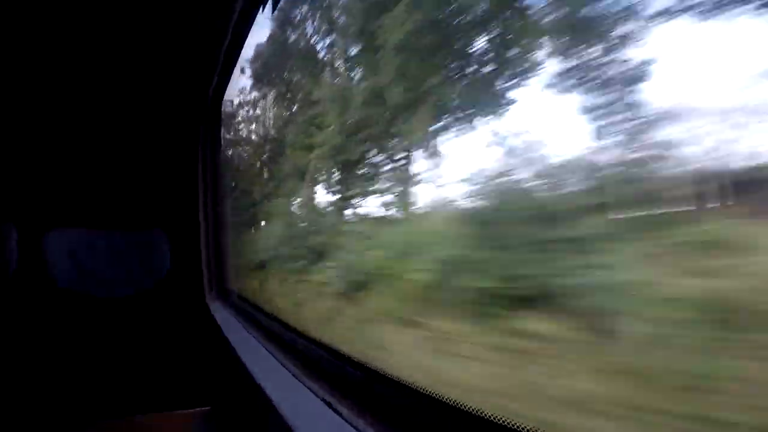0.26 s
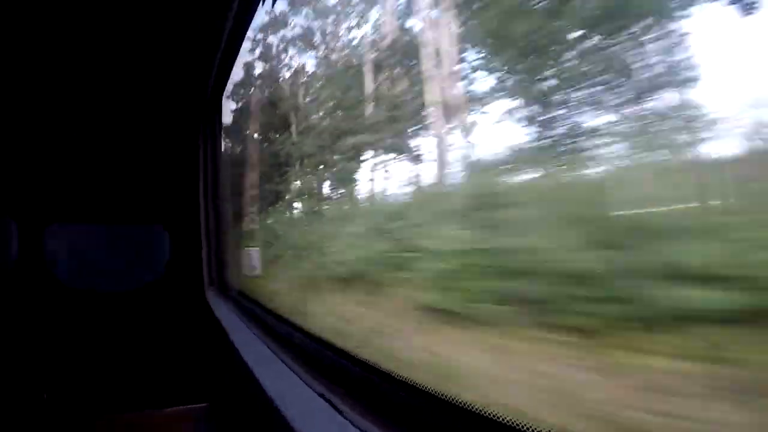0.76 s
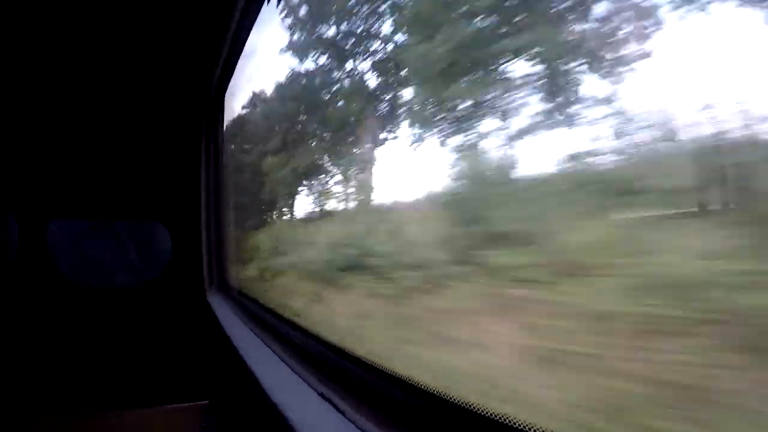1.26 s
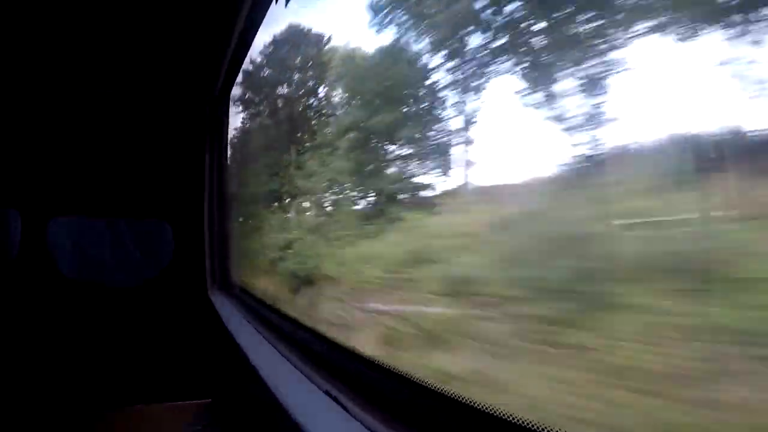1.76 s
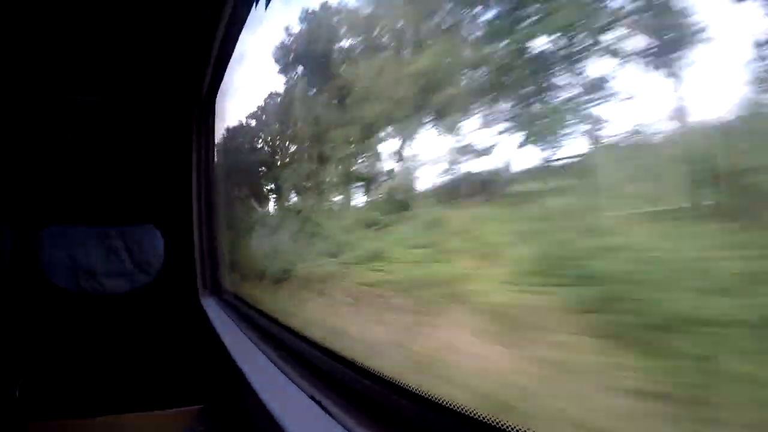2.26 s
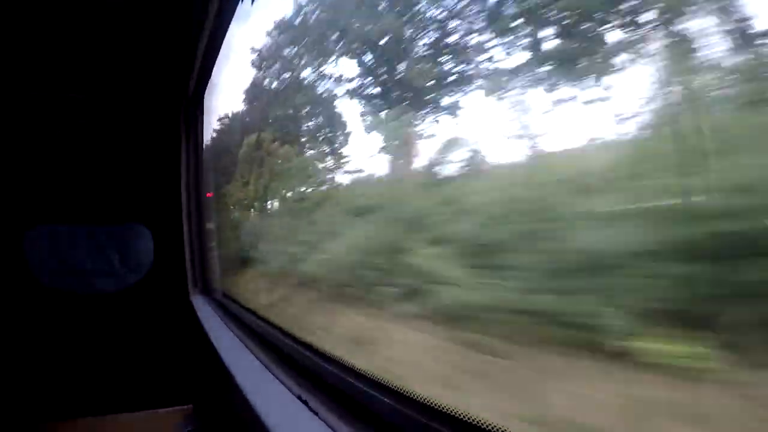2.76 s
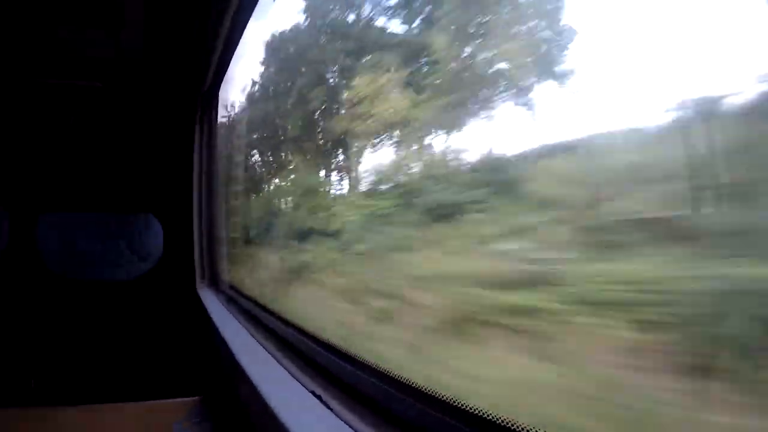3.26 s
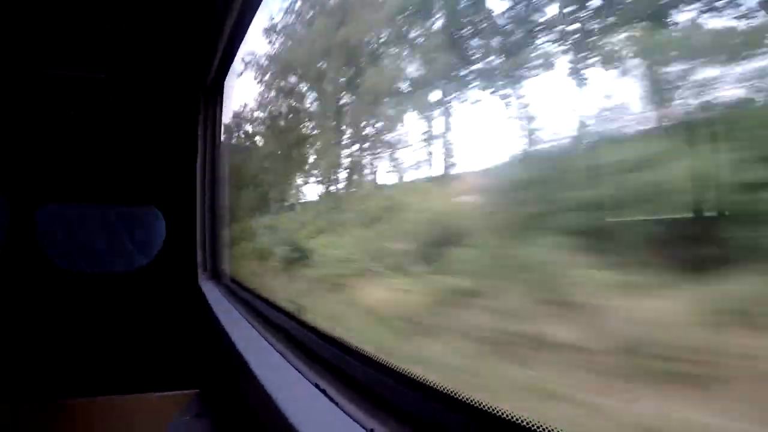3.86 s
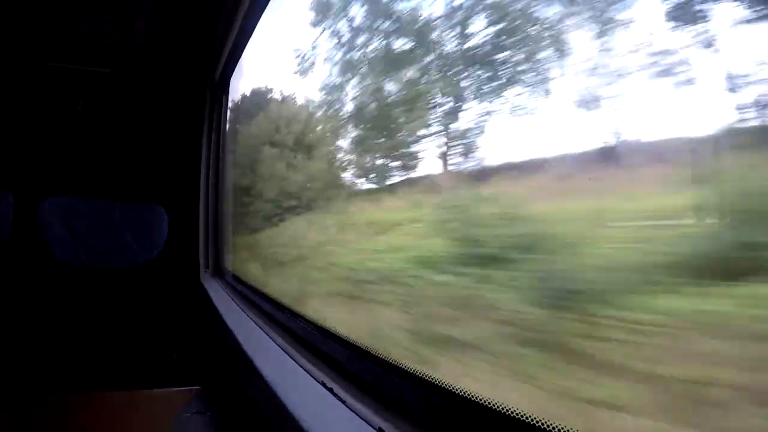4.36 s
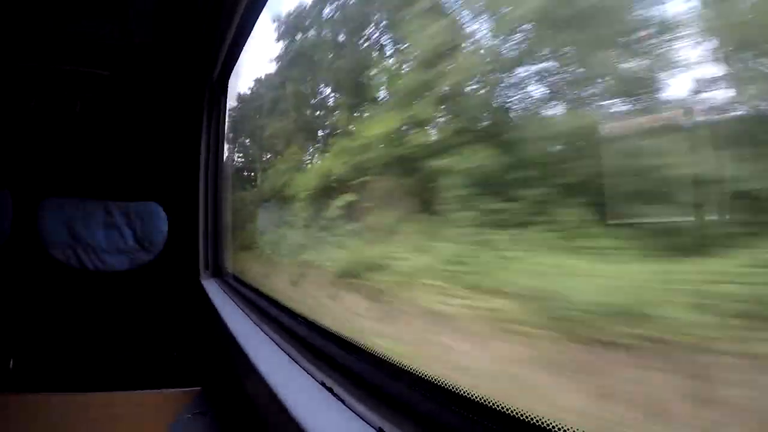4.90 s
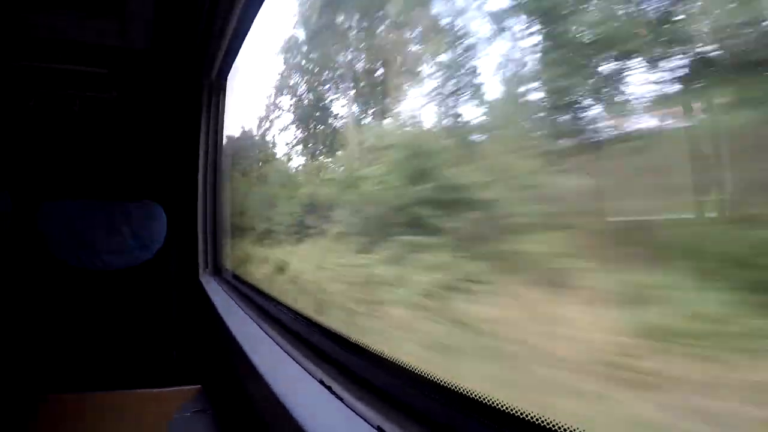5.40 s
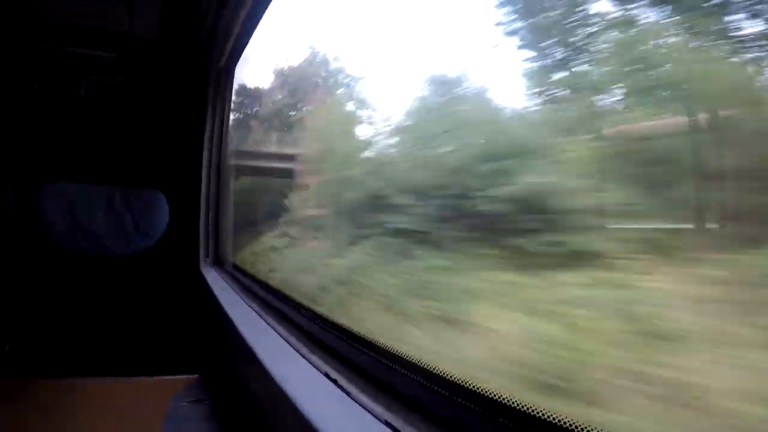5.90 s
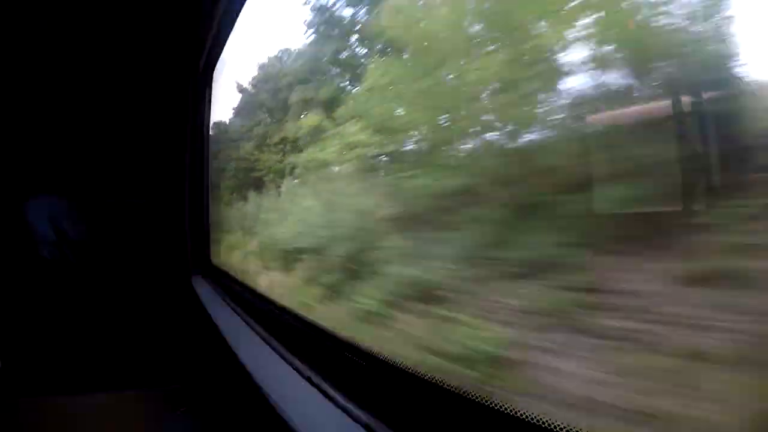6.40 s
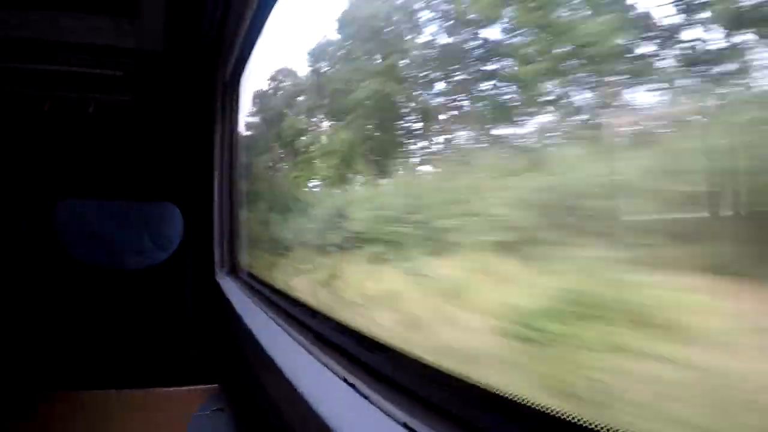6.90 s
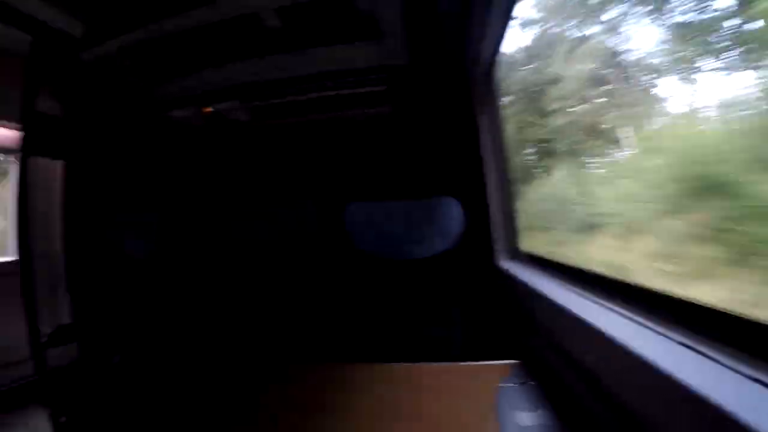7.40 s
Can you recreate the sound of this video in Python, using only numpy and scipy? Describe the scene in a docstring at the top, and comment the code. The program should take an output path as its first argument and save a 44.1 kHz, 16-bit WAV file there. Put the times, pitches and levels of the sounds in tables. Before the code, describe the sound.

Inside a fast train coach, a deep rumble and uneven low drone roll on while a window seal whistles breathily and loose trim ticks and knocks.

```python
"""A deep rumble and uneven drone, muffled rail roar and a whistling window seal: inside a fast train coach.
Body, rails, air and rubbing trim are filtered noise; wheels, sleepers, running gear, drive and
electrics are wandering sines or steady whines. The seal's whistle is a noise band plus a clear note.
Trim knocks are decaying resonant noise; small fittings tick with a snap and a noise tail, over a faint rattle."""
import sys
import numpy as np
from scipy import signal
from scipy.fft import rfft, irfft, next_fast_len
from scipy.io import wavfile

SR = 44100
rng = np.random.default_rng(int(sys.argv[2]) if len(sys.argv) > 2 else 0)


def generate_wav(sig):
    """Save sig (samples, or channels by samples) to the path in sys.argv[1] as 16-bit PCM at SR."""
    pcm = np.round(np.clip(np.atleast_2d(sig).T, -1, 1) * 32767).astype(np.int16)
    wavfile.write(sys.argv[1], SR, pcm)


N = 337365
TIME = np.arange(N) / SR

# response of small trim fittings: freq_hz, gain_db
FITTING_RESPONSE = [(600, -9.5), (1600, -6.5), (2400, 8.5), (4000, 7.5), (5400, 3.5), (6700, -1.5),
                    (8000, -8), (11000, -16.5), (15000, -19.5)]


def gain_of(db):
    """Decibels to amplitude."""
    return 10 ** (np.asarray(db) / 20)


def evened(x):
    """Scales to an rms of one."""
    return x / np.sqrt(np.mean(x ** 2) + 1e-20)


def read(points, hz):
    """Reads a spectrum on a log-frequency axis."""
    f, value = np.transpose(points)
    return np.interp(np.log(hz + 1), np.log(f + 1), value)


def follow(rows):
    """Interpolates a level curve at every sample."""
    return np.interp(TIME, *np.transpose(rows))


def add(mix, start_s, sound):
    """Mixes a sound in at start_s, cut at the end of the mix."""
    part = mix[max(round(start_s * SR), 0):][:len(sound)]
    part += sound[:len(part)]


def drift(rate_hz):
    """Gaussian low-passed noise of rms one."""
    size = next_fast_len(N)
    hz = np.fft.rfftfreq(size, 1 / SR)
    spectrum = rfft(rng.standard_normal(size)) * np.exp(-(hz / rate_hz) ** 2)
    return evened(irfft(spectrum, size)[:N])


def colour(x, spectrum, peaks=()):
    """Filters by a spectrum with resonant peaks on top."""
    size = next_fast_len(len(x))
    hz = np.fft.rfftfreq(size, 1 / SR)
    db = read(spectrum, hz)
    for centre_hz, width_hz, lift_db in peaks:
        db = db + lift_db / (1 + (2 * (hz - centre_hz) / width_hz) ** 2)
    return irfft(rfft(x, size) * gain_of(db), size)[:len(x)]


def white():
    """Noise of 0 dB per Hz."""
    return rng.standard_normal(N) * np.sqrt(SR / 2)


def tone(hz):
    """Sine of rms one that follows a pitch curve."""
    turns = np.cumsum(hz * np.ones(N)) / SR + rng.random()
    return np.sqrt(2) * np.sin(2 * np.pi * turns)


def wheels(offset_db=-2, wheel_hz=21.75, wander_hz=0.83, swell_db=2, swells_hz=4):
    """The wheels shake the body once a turn, now harder, now softer."""
    # wheel thrum: time_s, relative_db
    thrum_curve = [(0, -14.5), (2.25, -13), (2.45, -22.5), (4.5, -20), (4.72, -9), (4.97, -19.5),
                   (6.35, -16.5), (7.65, -16.5)]
    level_db = follow(thrum_curve) + offset_db + swell_db * drift(swells_hz)
    return gain_of(level_db) * tone(wheel_hz + wander_hz * drift(4.66))


def rumble(swell_db=1.5, swells_hz=4, deep_hz=68):
    """The car body shakes on its springs; only the deepest part swells and sinks irregularly."""
    # body spectrum: freq_hz, relative_db_per_hz
    body_spectrum = [(5, -69), (11, -37), (15, -44.5), (22, -33), (30, -30.5), (44, -39), (62, -48.5),
                     (76, -46.5), (87, -41.5), (110, -48), (142, -50), (155, -51.5), (180, -53), (205, -64),
                     (400, -117)]
    # gain of the deep part: time_s, gain_db
    deep_curve = [(0, -0.5), (2.3, -3), (2.55, 0.5), (3.8, 0.5), (5.4, 1), (6.9, 2.5), (7.65, -2)]
    shaking = colour(white(), body_spectrum)
    deep = signal.sosfiltfilt(signal.butter(3, deep_hz, fs=SR, output="sos"), shaking)
    return shaking - deep + deep * gain_of(follow(deep_curve) + swell_db * drift(swells_hz))


def sleepers(offset_db=-1, boom_hz=92.35, wander_hz=0.55, throb_db=1.5, throb_hz=11):
    """The sleepers set the cabin booming with an uneven throb."""
    # sleeper boom: time_s, relative_db
    boom_curve = [(0, -20), (1.3, -24), (1.62, -19.5), (2.11, -19.5), (2.24, -35.5), (2.4, -27),
                  (2.49, -11), (2.76, -20), (2.95, -16.5), (4.1, -15.5), (4.76, -22), (5.05, -16),
                  (5.56, -19.5), (5.85, -18), (6.63, -18), (6.73, -30.5), (6.86, -19), (7.65, -15)]
    level_db = follow(boom_curve) + offset_db + throb_db * drift(throb_hz)
    return gain_of(level_db) * tone(boom_hz + wander_hz * drift(4.27))


def running_gear(drone_hz=162.25, wander_hz=0.55, waver_db=1.0):
    """The running gear drones at a slightly wandering pitch."""
    # gear drone: time_s, level_db
    drone_curve = [(0, -36), (.65, -26.5), (.98, -33.5), (1.2, -29), (1.65, -27.5), (2.76, -38),
                   (2.94, -28), (3.7, -30.5), (4.42, -26), (4.66, -30.5), (5.9, -29), (6.08, -36),
                   (6.85, -27.5), (7.65, -32.5)]
    level_db = follow(drone_curve) + waver_db * drift(2.5)
    return gain_of(level_db) * tone(drone_hz + wander_hz * drift(4.7))


def hums(waver_db=2):
    """Running gear, fans and electrics hum and waver, under a thin steady electrical whine."""
    # hums: pitch_hz, level_db, wander_hz
    hum_rows = [(51, -35, .4), (101.8, -34, .5), (480, -52.5, 2.5), (2035, -79, 9), (3063, -75, 12),
                (3880, -85, 2), (3922, -84, 2), (4888, -84, 15), (4970, -85, 30), (5878, -89, 8)]
    # electrical whine: pitch_hz, level_db
    whine_rows = [(7708, -93), (7779, -91), (7822, -91), (7892, -92), (11676, -94), (11719, -95),
                  (15509, -96), (15579, -93), (15622, -92)]
    out = np.zeros(N)
    for pitch_hz, level_db, wander_hz in hum_rows:
        out += gain_of(level_db + waver_db * drift(3.6)) * tone(pitch_hz + wander_hz * drift(12))
    for pitch_hz, level_db in whine_rows:
        out += gain_of(level_db) * tone(pitch_hz)
    return out


def drive(offset_db=-1.0, mesh_hz=1786, wander_hz=2, waver_db=2.5):
    """A gear mesh sings faintly through the floor and wavers."""
    # drive whine: time_s, relative_db
    whine_curve = [(0, -72.5), (2.3, -75.5), (3.6, -73.5), (4.2, -74), (4.7, -69.5), (5.1, -66),
                   (5.5, -72.5), (6.5, -75), (7.5, -68)]
    level_db = follow(whine_curve) + offset_db + waver_db * drift(5)
    return gain_of(level_db) * tone(mesh_hz + wander_hz * drift(8.9))


def rolling(offset_db=38, flutter_db=1.0):
    """Rough rail under the wheels, muffled by the floor and ringing in the cabin."""
    # noise through the floor: freq_hz, relative_db_per_hz
    floor_spectrum = [(100, -78), (230, -60), (330, -66.5), (400, -66), (450, -67.5), (550, -69),
                      (680, -76), (800, -82), (1020, -81), (1300, -95.5), (2000, -108), (5000, -135)]
    # cabin resonances: centre_hz, width_hz, lift_db
    cabin_peaks = [(293, 15, 6.5), (366, 16, 5), (392, 22, 2), (535, 25, 2.5), (750, 26, 3.5), (888, 46, 3)]
    # level set by rail roughness: time_s, relative_db
    roughness_curve = [(0, -38), (1.3, -38), (2.02, -36.5), (2.22, -41), (2.54, -36.5), (2.72, -42),
                       (3.08, -38), (4.2, -38), (4.4, -36.5), (4.85, -38.5), (6.1, -39), (6.3, -37),
                       (7.2, -38.5), (7.65, -40)]
    level_db = follow(roughness_curve) + offset_db + flutter_db * drift(22)
    return colour(white(), floor_spectrum, cabin_peaks) * gain_of(level_db)


def seal_gap(edge_s=0.083):
    """As the body flexes the seal gapes: relative opening and strength of the clear note."""
    # gaping spells: start_s, end_s, opening_db, clear_note_0_to_1
    spells = [(0, 0.24, 1, 0.9), (0.398, 0.504, 0, 0.4), (0.59, 0.754, -3, 0.8), (.87, 1.165, -4.5, .8),
              (1.39, 1.47, -12, .3), (1.547, 1.79, -6, .7), (1.92, 2.192, -13.5, .55),
              (2.55, 2.722, -8, .7), (2.84, 3.4, -5.5, 0.56), (3.4, 3.95, 2, 0.4), (3.95, 4.54, -1, .15),
              (4.605, 4.813, -2, .1), (4.96, 6.25, -3.5, .15), (6.344, 6.85, -4, .5),
              (7.15, 7.435, -6, 0.03)]
    gap, clear = np.zeros((2, N))
    for start_s, end_s, opening_db, note in spells:
        # linear ramps of edge_s, centred on start and end
        spell = np.clip(np.minimum(TIME - start_s, end_s - TIME) / edge_s + .5, 0, 1)
        gap += gain_of(opening_db) * spell
        clear += np.clip(note, 0, 1) * spell
    return gap, clear


def air(gap, shut_db=-2.5, opening_db=2.5, flutter_db=1.4):
    """Turbulence along the skin hisses, flutters with the gusts and grows as the seal opens."""
    # air hiss: freq_hz, relative_db_per_hz
    hiss_spectrum = [(500, -105), (1400, -95.5), (1800, -93), (2100, -92), (2700, -93.3), (3100, -95.5),
                     (3400, -98.5), (4100, -98), (4500, -102), (5000, -99), (5700, -105), (7200, -109),
                     (10000, -113), (14000, -116.5), (15300, -126)]
    # narrow hiss resonances: centre_hz, width_hz, lift_db
    hiss_peaks = [(1720, 35, 3.5), (2020, 60, 1), (2690, 86, 1.5), (3120, 90, 4), (3320, 150, 2.5),
                  (4080, 35, 3.5), (4240, 33, 4), (4690, 55, 2.5), (4950, 150, 3)]
    level_db = shut_db + opening_db * np.sqrt(gap) + flutter_db * drift(23)
    return colour(white(), hiss_spectrum, hiss_peaks) * gain_of(level_db)


def whistle(gap, clear, pitch_hz=3240, breath_db=-63.0, leak=0.055, note_db=-65.0, wander_hz=15,
            octave_db=-17):
    """The draught excites the seal gap: a breathy noise band, at times joined by a clear note."""
    breathy = (drift(80) + 1j * drift(80)) * np.exp(2j * np.pi * pitch_hz * TIME)
    jet = breathy / np.sqrt(abs(breathy) + 1)  # the jet saturates, which evens it out
    band = evened(jet.real) + gain_of(octave_db) * evened((jet ** 2).real)
    sough = gain_of(breath_db) * (gap + leak) * band
    note = gain_of(note_db) * clear * tone(pitch_hz + wander_hz * drift(25))
    return sough + note


def rubbing(shake, gap, offset_db=-4, flex_db=5, catch_db=2, catches_hz=20):
    """Shaken trim slides on its frame: hisses twice a swing, catches, rubs harder as the seal gapes."""
    # rubbing noise: freq_hz, relative_db_per_hz
    rub_spectrum = [(1000, -112), (2500, -101), (4200, -101.5), (6000, -106.5), (8000, -111),
                    (11000, -112.5), (13500, -114.5), (15300, -125)]
    # longer scrapes: middle_s, length_s, added_db
    scrape_rows = [(2.03, .2, 5.5), (4.725, 0.1, 2.5), (5.456, 0.18, 6.5), (7.3, 0.22, 3.5)]
    stroke = evened(np.abs(shake) * gain_of(catch_db * drift(catches_hz)))
    level_db = offset_db + flex_db * np.sqrt(gap)
    for middle_s, length_s, added_db in scrape_rows:
        level_db += added_db * np.exp(-(2 * (TIME - middle_s) / length_s) ** 2)
    return colour(white(), rub_spectrum) * stroke * gain_of(level_db)


def chatter(hits_per_s=45, level_db=-70, t60_s=.06):
    """The trim keeps up a faint irregular rattle of decaying noise bursts."""
    sizes = rng.random(N) * (rng.random(N) < hits_per_s / SR)
    envelope = signal.lfilter([1], [1, -gain_of(-60 / (t60_s * SR))], sizes)
    return gain_of(level_db) * evened(colour(envelope * rng.standard_normal(N), FITTING_RESPONSE))


def ticks(offset_db=3, t60_s=0.13, snap_db=26, ring_width_hz=1200, lead_s=.003):
    """A fitting snaps once; a spray of cabin reflections follows."""
    # ticks: time_s, relative_db, ring_hz, ring_db, dry_snap_share_0_to_1
    tick_rows = [(0.232, -43, 5100, 10, 0.46), (0.505, -43, 5400, 16, 0.7), (.630, -53, 2600, 5, 0.2),
                 (.947, -60, 2200, 9, .3), (1.070, -49.5, 4300, 11, 0.1), (1.859, -44.5, 5600, 7, 0.24),
                 (2.018, -53, 5500, 7, 0.2), (2.372, -46.5, 5400, 5, .35), (2.484, -47.5, 5500, 15, .2),
                 (3.166, -46.5, 2800, 6.5, .1), (3.272, -48.5, 4200, 11, .2), (3.378, -49, 2700, 10, 0.1),
                 (3.9659, -42.5, 3600, 1.5, 0.63), (4.414, -47.5, 4000, 10, 0.04),
                 (4.454, -50, 4600, 2, .2), (4.761, -54, 2700, 7, 0), (5.302, -53, 3900, 3, 0.2),
                 (5.438, -48.5, 4400, 3.5, .3), (5.824, -47.5, 4800, 7, .3), (6.213, -43.5, 3200, 9.5, 0.4),
                 (6.374, -52, 3700, 9, 0.24), (7.098, -47, 2900, 12, 0.1), (7.348, -53, 3200, 3.5, 0.1)]
    out, t = np.zeros(N), np.arange(SR // 6) / SR
    for time_s, tick_db, ring_hz, ring_db, dry_share in tick_rows:
        dry_share = np.clip(dry_share, 0, 1)
        decay = gain_of(-60 * (t - lead_s) / t60_s) * (t > lead_s)
        blow = (1 - dry_share) * rng.standard_normal(len(t)) * decay
        blow[round(lead_s * SR)] += dry_share * gain_of(snap_db)
        sound = colour(blow, FITTING_RESPONSE, [(ring_hz, ring_width_hz, ring_db)])
        add(out, time_s - lead_s, gain_of(tick_db + offset_db - ring_db) * sound)
    return out


def knocks(offset_db=5, body_db=1, crack_t60_s=0.2, body_t60_s=0.12, strike_db=3):
    """A loose panel bumps its frame: a sharp crack, with low modes that build up more slowly."""
    # knocks: time_s, relative_db
    knock_rows = [(1.070, -43.5), (1.861, -37), (2.018, -43), (2.485, -37.5), (3.167, -48.5), (4.420, -45),
                  (6.214, -35.5), (6.375, -47), (7.348, -44)]
    # panel response: freq_hz, gain_db
    panel_response = [(150, -3.5), (300, 12), (520, 17), (700, 14), (900, 10), (1400, -4), (1850, -0.5),
                      (2100, -8), (2600, -3), (3200, -14.5), (4500, -17), (6500, -30), (10000, -32.5),
                      (15000, -37.5)]
    # panel resonances: centre_hz, width_hz, lift_db
    panel_peaks = [(1180, 79, 6.5), (1870, 110, -8), (2110, 330, 10), (2540, 100, 0.5), (3200, 100, 4),
                   (4950, 200, 3.5)]
    out, t = np.zeros(N), np.arange(SR // 4) / SR
    rise_s, body_rise_s, strike_s = .0015, .005, .005
    lows = signal.butter(2, 1300, fs=SR, output="sos")
    for time_s, knock_db in knock_rows:
        ring = evened(colour(rng.standard_normal(len(t)), panel_response, panel_peaks))
        body = signal.sosfiltfilt(lows, ring)
        crack_db = strike_db * np.exp(-t / strike_s) - 60 * t / crack_t60_s
        sound = (ring - body) * gain_of(crack_db) * np.minimum(t / rise_s, 1)
        sound += body * gain_of(body_db - 60 * t / body_t60_s) * np.minimum(t / body_rise_s, 1)
        add(out, time_s - rise_s, gain_of(knock_db + offset_db) * sound)
    return out


def scene():
    """Everything as heard from a window seat."""
    shake = wheels() + rumble()
    gap, clear = seal_gap()
    tones = sleepers() + running_gear() + hums() + drive()
    draught = air(gap) + whistle(gap, clear)
    trim = rubbing(shake, gap) + chatter() + ticks() + knocks()
    return (shake + tones + rolling() + draught + trim)[None]


def record(dry, edge_hz=15700, fade_s=.006):
    """Soft ends, then a steep low-pass."""
    ends = np.sin(np.pi / 2 * np.clip(np.minimum(TIME, TIME[-1] - TIME) / fade_s, 0, 1)) ** 2
    low_pass = signal.firwin(511, edge_hz, window=("kaiser", 9), fs=SR)
    return signal.oaconvolve(dry * ends, low_pass[None], "same")


dry = scene()
out = record(dry)
generate_wav(out)
```